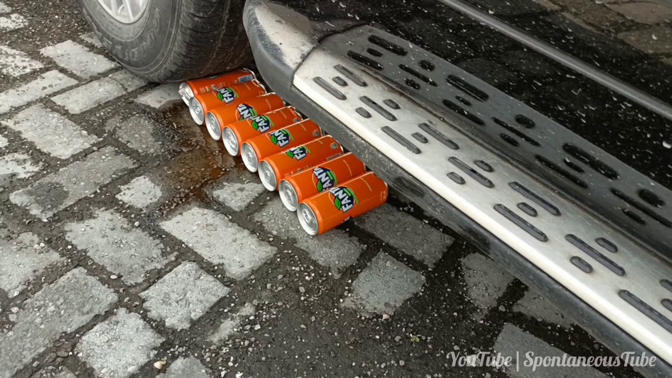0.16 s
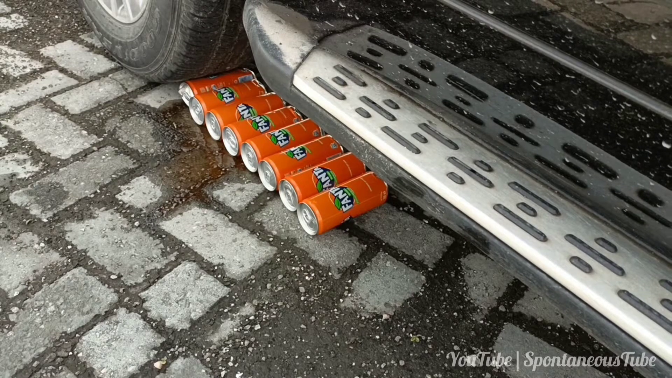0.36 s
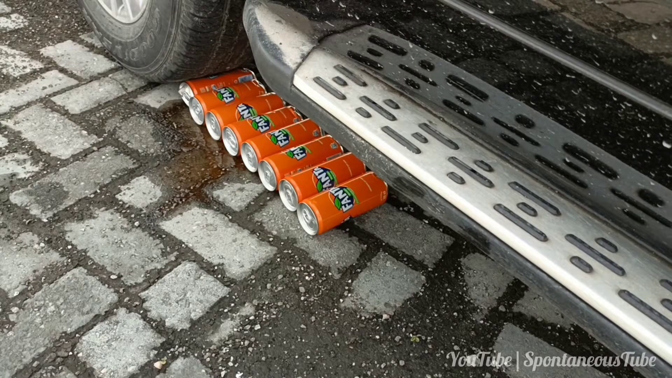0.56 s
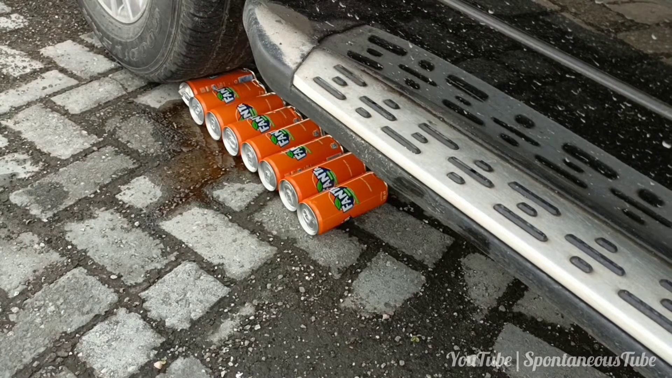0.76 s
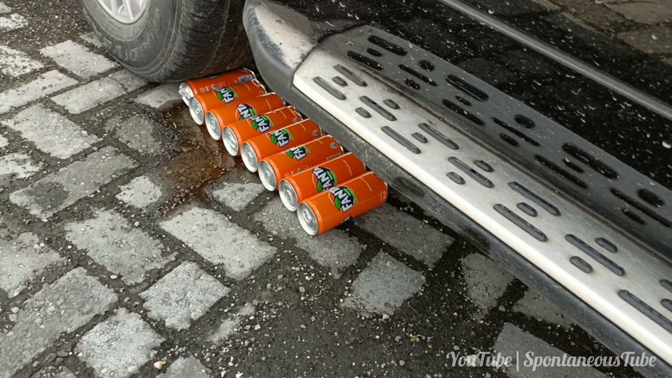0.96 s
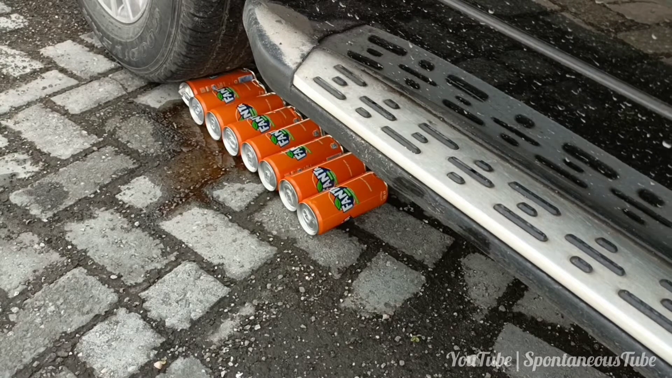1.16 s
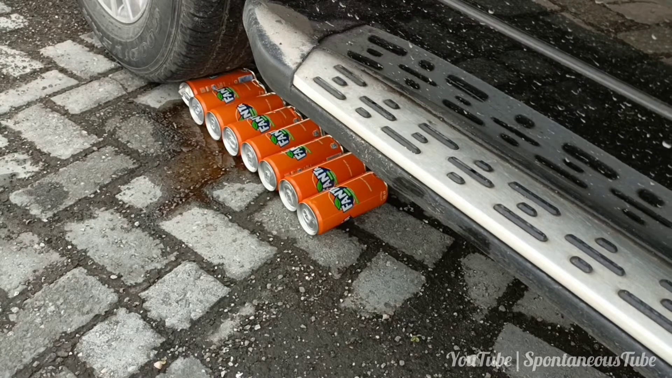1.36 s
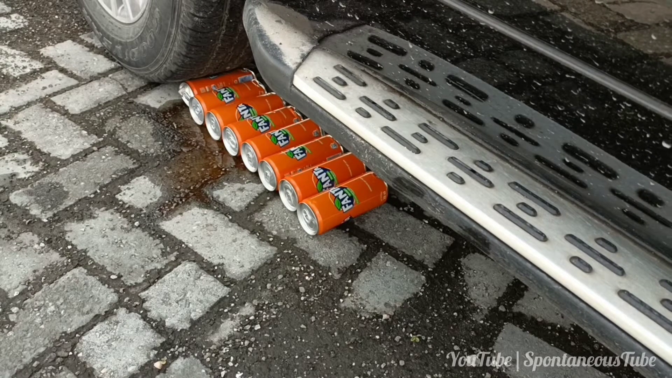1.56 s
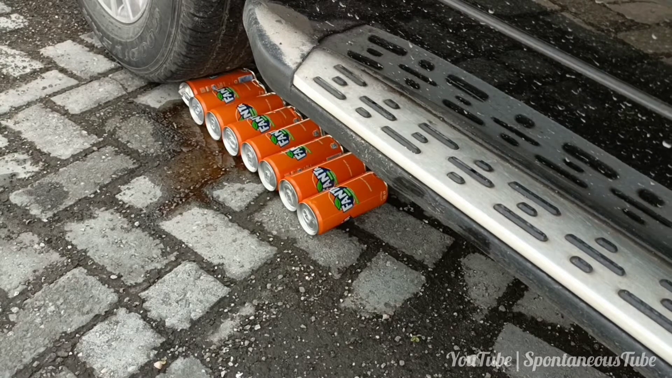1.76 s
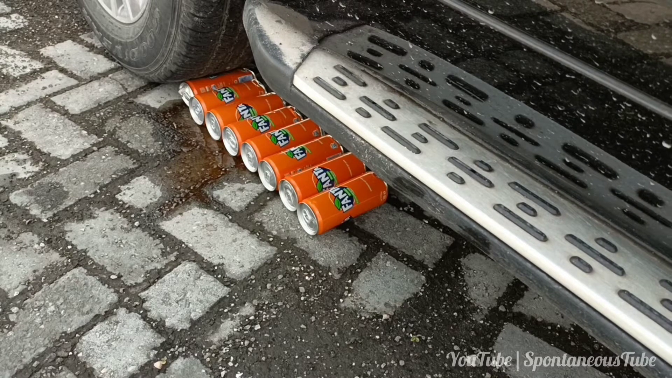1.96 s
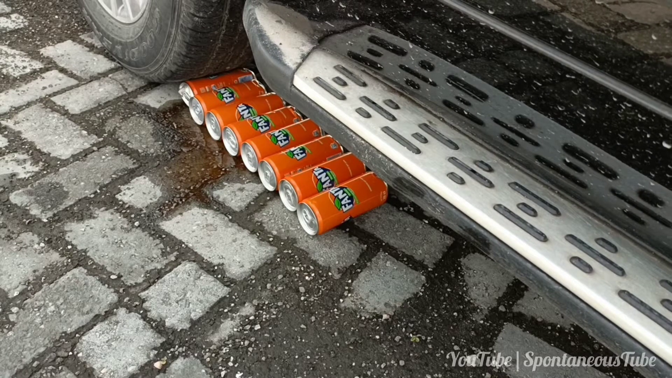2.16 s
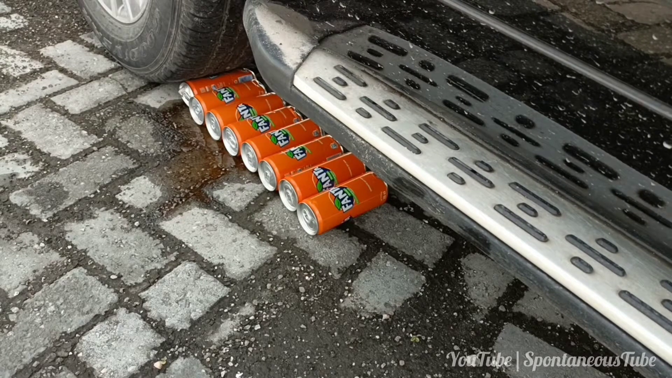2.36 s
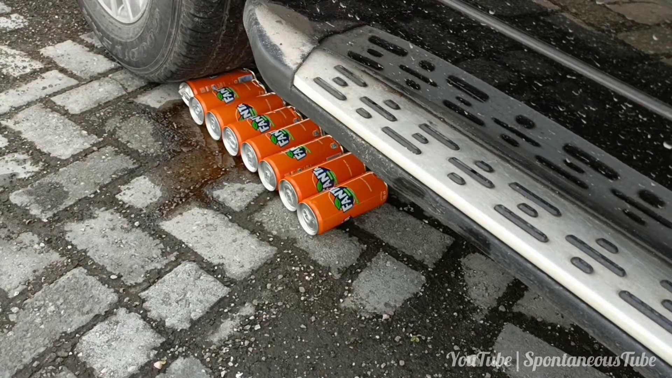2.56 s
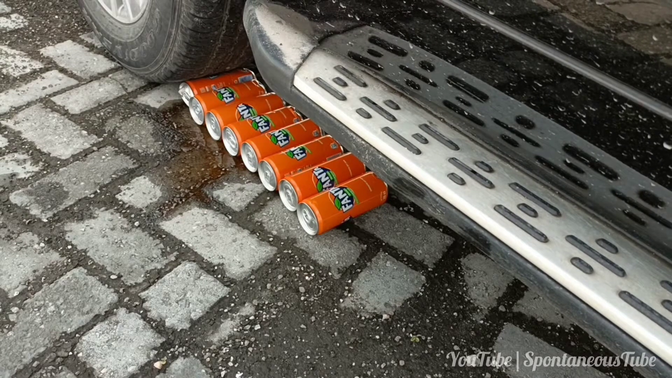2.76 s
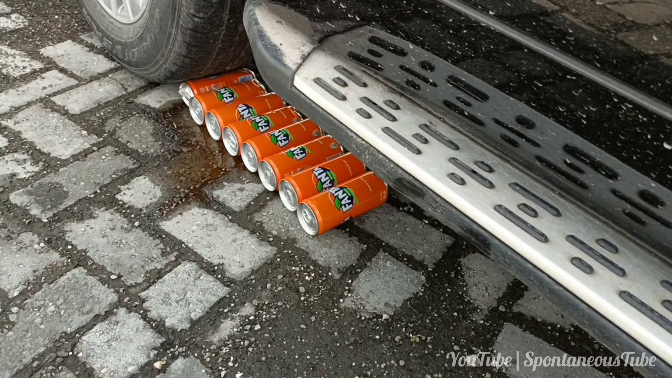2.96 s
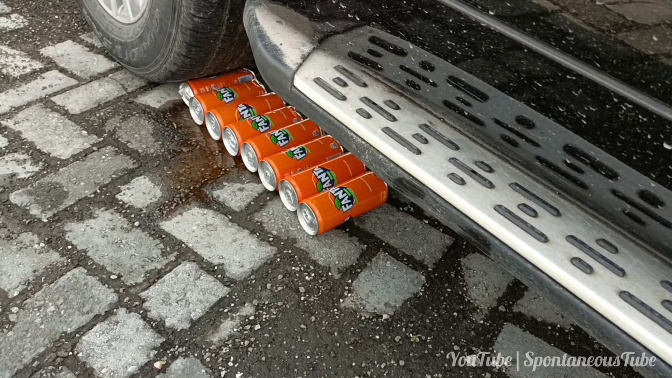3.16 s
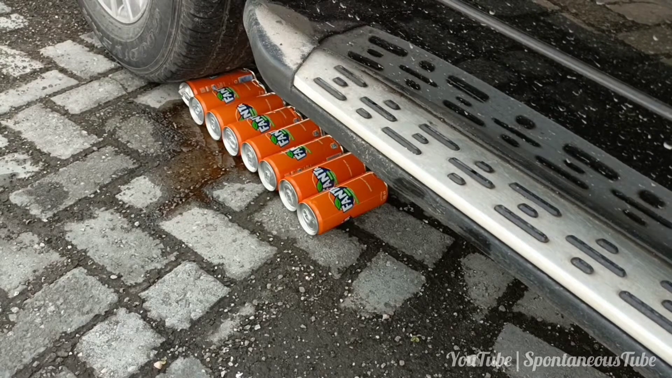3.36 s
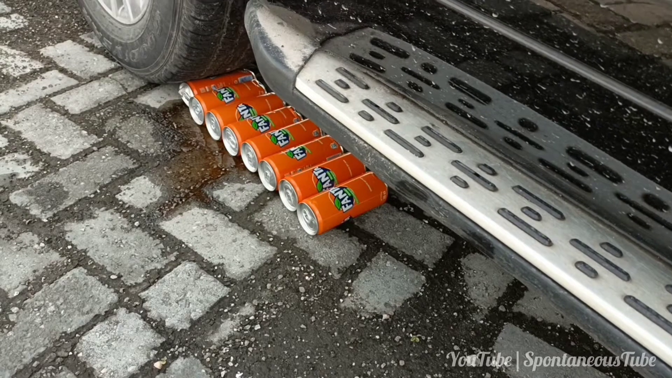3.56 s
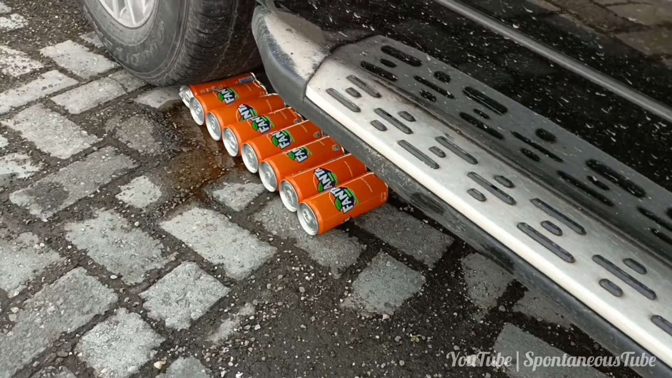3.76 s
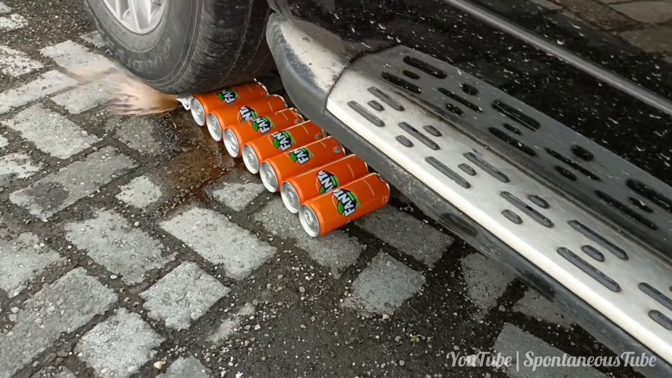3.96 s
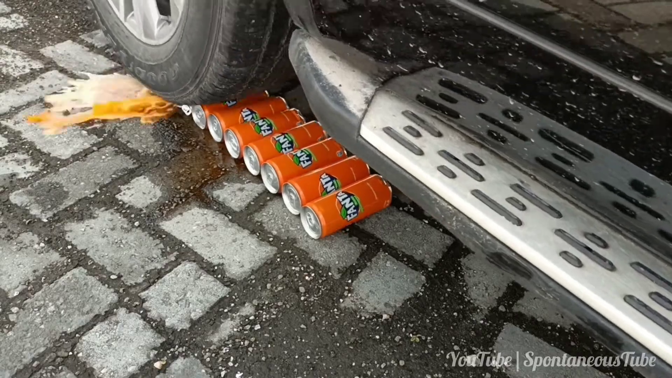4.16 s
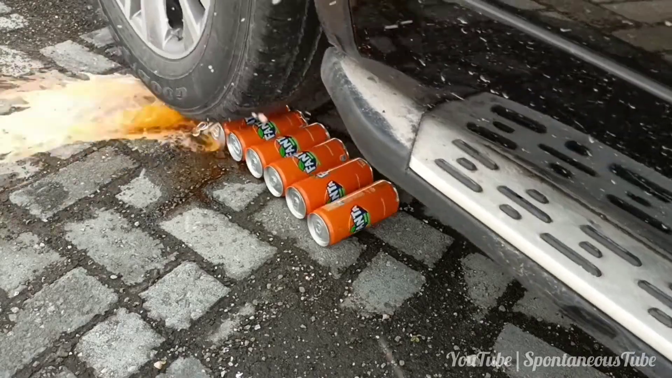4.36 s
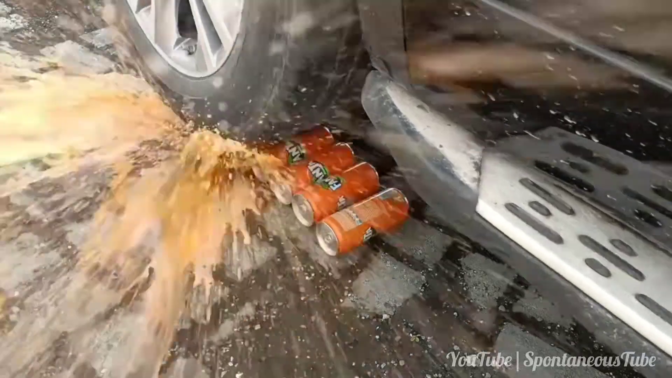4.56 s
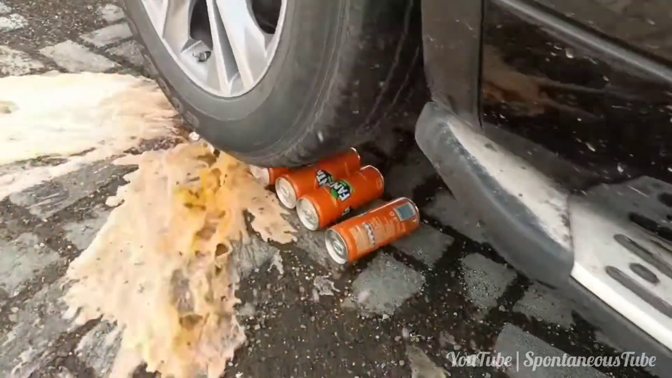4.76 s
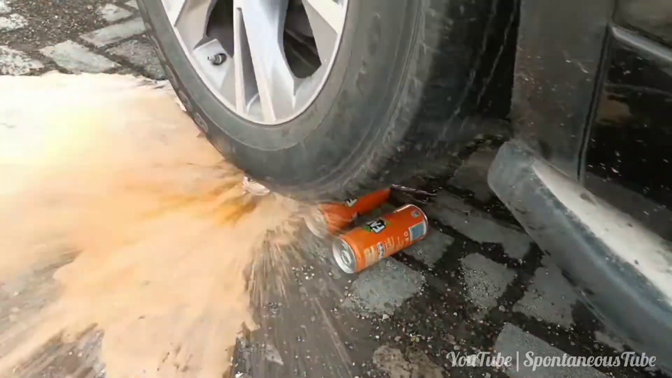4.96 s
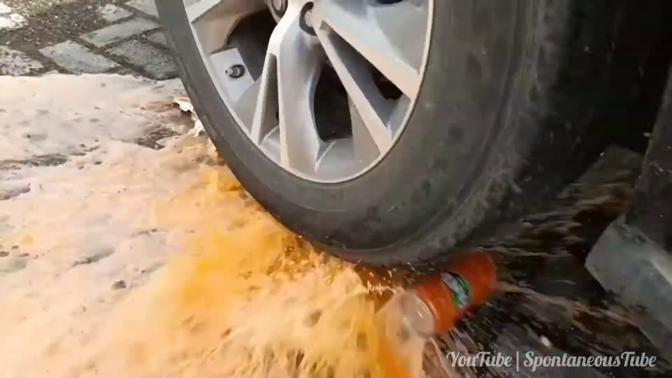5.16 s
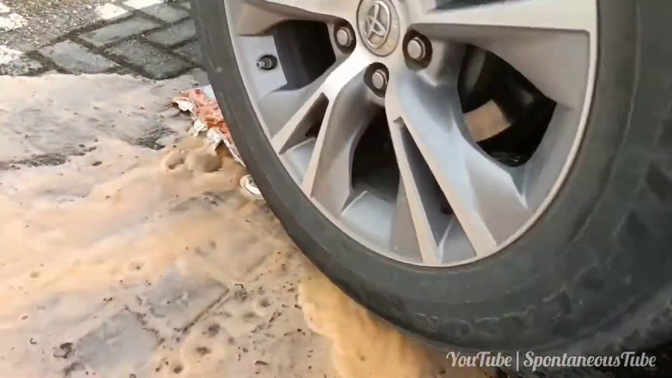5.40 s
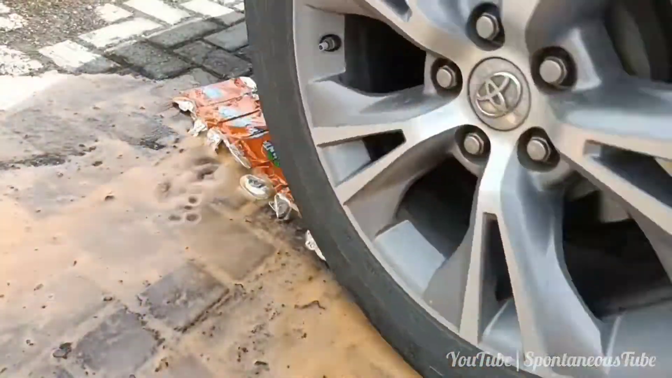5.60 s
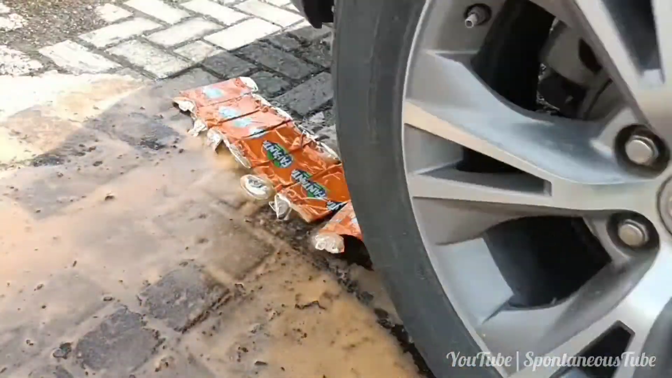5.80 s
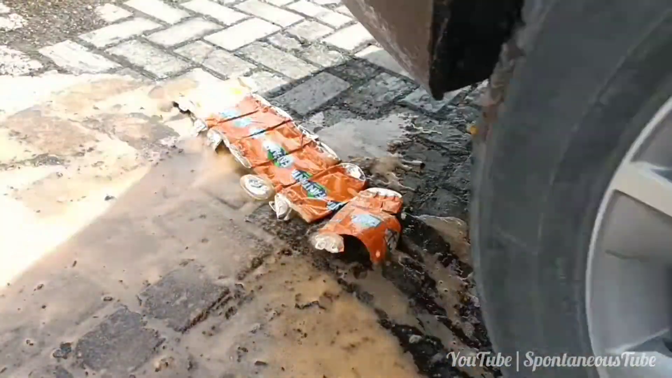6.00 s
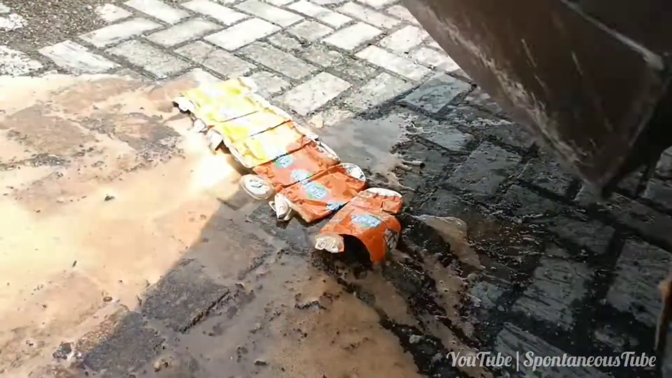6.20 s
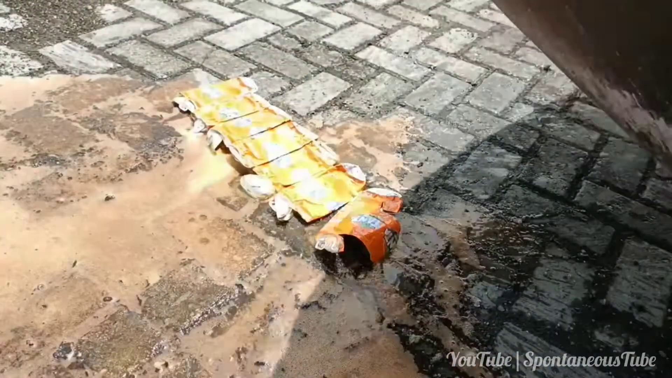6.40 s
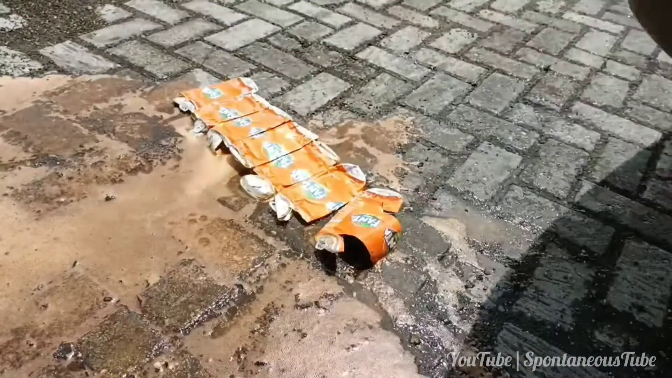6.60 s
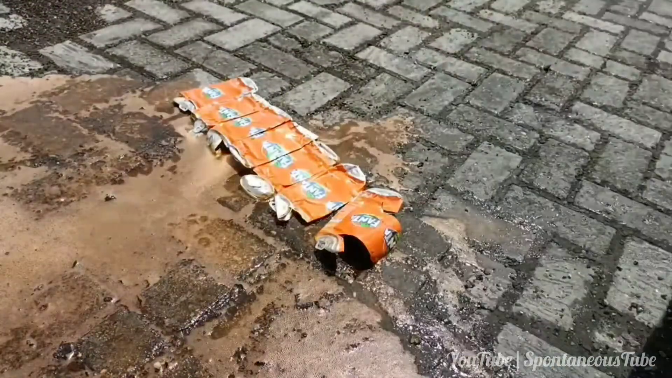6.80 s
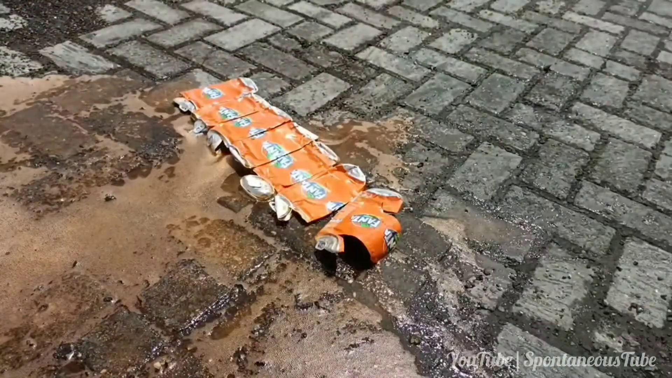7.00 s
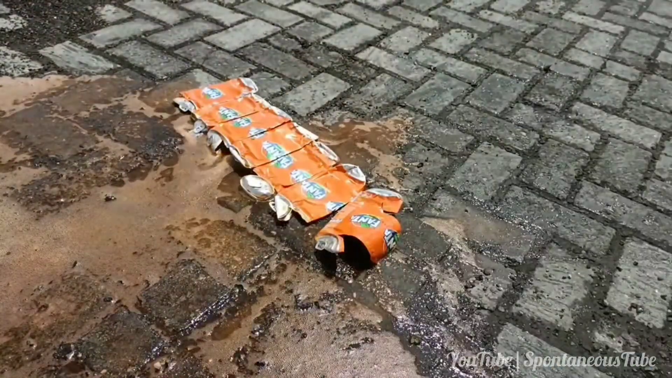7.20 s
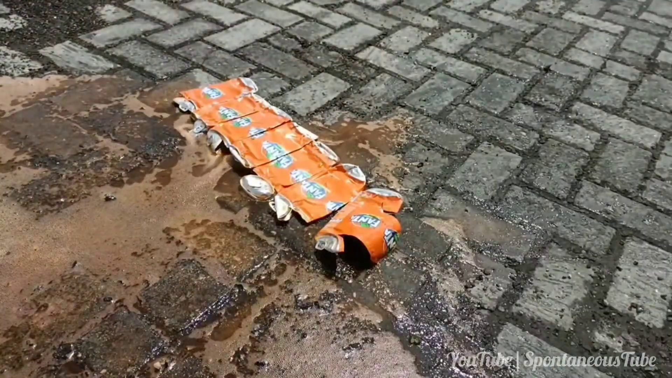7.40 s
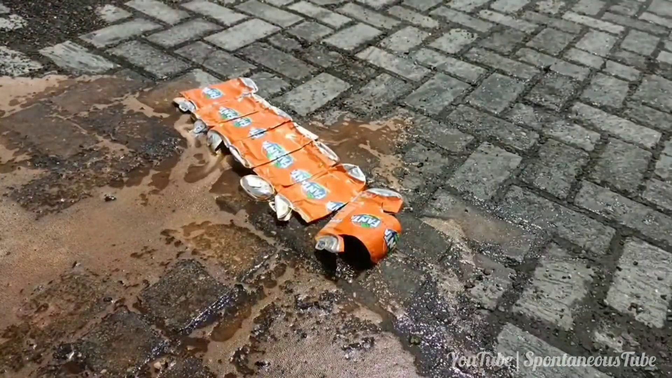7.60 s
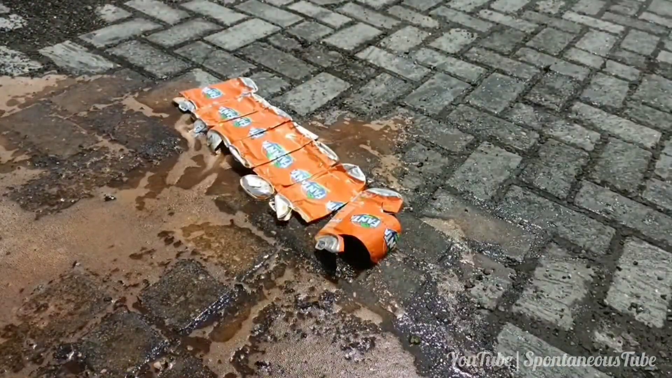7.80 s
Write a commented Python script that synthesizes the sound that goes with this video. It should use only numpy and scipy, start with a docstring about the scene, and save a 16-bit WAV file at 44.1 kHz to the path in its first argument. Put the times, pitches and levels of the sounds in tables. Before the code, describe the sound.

A car idles quietly on paving, clunks into drive, then a tyre bursts a row of full drink cans with sharp cracks, spray and wind buffeting.

```python
"""Car crushing drink cans

A car idles on paving, engages its drive and rolls one tyre over a row of full aluminium cans.
Noise bursts through wall resonances buckle the cans; banded noise and random clicks spray and fizz.
The engine is shaped noise, ticks and ringing parts; wind buffets a small microphone, lightly
before the cans and strongly after them.
"""
import sys
import numpy as np
from scipy import signal
from scipy.fft import rfft, irfft
from scipy.io import wavfile
from scipy.ndimage import uniform_filter1d

SR = 44100
rng = np.random.default_rng(int(sys.argv[2]) if len(sys.argv) > 2 else 0)


def inscribe(sig):
    """Save sig as 16-bit PCM at rate SR to the path in sys.argv[1].

    A 1-D sig is mono; a 2-D sig holds one channel per row.
    Samples are clipped to [-1, 1] before scaling.
    """
    pcm = np.round(np.clip(np.atleast_2d(sig).T, -1, 1) * 32767)
    wavfile.write(sys.argv[1], SR, pcm.astype(np.int16))


N = 345876

# Engine noise spectrum, interpolated over log f: [f/Hz, relative density/dB]
IDLE_SPECTRUM = [(18, -53.5), (30, 2.5), (75, 3.5), (161, -0.5), (266, -4), (303, -5.5), (437, -6),
                 (616, -10.5), (1350, -13), (1860, -10), (3580, -20), (3870, -20), (8080, -20.5),
                 (10500, -21.5), (16000, -21)]
# Engine level change: [t/s, level/dB]
ENGINE_LEVEL = [(0, 4), (3.2, 4.5), (3.6, 7.5), (3.88, -2.5), (4.1, -9), (4.66, -16.5), (5.1, -25),
                (5.25, 5.5), (6.05, 6.5), (7.0, 3.5), (7.84, 0)]
# Steadily ringing engine parts: [f/Hz, width/Hz, mean level/dB]
ENGINE_MODES = [(1338, 75, -65.5), (1022, 44, -73), (5640, 140, -77.5), (10100, 300, -76)]
# Injector tick resonances: [f/Hz, width/Hz, relative level/dB]
TICK_MODES = [(9070, 360, 7), (10300, 750, -1), (15000, 1200, -3)]
# Brief whistle swells: [centre t/s, level/dB]
WHISTLE_SWELLS = [(2.34, -49.5), (2.66, -58.5), (2.77, -53.5), (2.87, -56), (2.98, -58), (3.02, -62),
                  (3.07, -47), (3.27, -56), (3.38, -48.5), (3.452, -48.5)]
# Drive line clunks: [t/s, relative body level/dB, relative rattle level/dB, base t60/s]
DRIVE_CLUNKS = [(1.4, -19.5, -41, 0.18), (1.476, -21.5, -48, 0.1), (1.665, -28, -55, 0.16),
                (3.446, -24, -67, 0.054)]
# Chassis resonances: [f/Hz, width/Hz, relative level/dB]
CHASSIS_MODES = [(175, 65, 1), (225, 10, -10.5), (411, 12.5, 0), (490, 29, -14), (976, 16, -22)]
# Loose metal resonances: [f/Hz, width/Hz, relative level/dB]
RATTLE_MODES = [(2100, 45, -6), (2450, 45, -8), (2800, 50, -8), (3900, 50, -7), (4400, 45, -5),
                (4750, 50, -7), (5600, 50, -7), (6300, 45, -4)]
# Wind at the microphone, a light then a strong gust, each a curve: [t/s, level/dB]
WIND_GUSTS = [
    [(1.55, -56), (1.974, -62), (2.358, -51), (2.616, -51), (2.714, -51), (2.9, -67)],
    [(6.12, -62), (6.258, -24), (6.412, -27.5), (7.35, -29), (7.562, -35), (7.84, -49)],
]
# Pushes of wind: [start t/s, hold/s, level/dB, extra reach/octaves]
WIND_BUFFETS = [(1.66, 0.061, -51, -0.2), (1.815, 0.14, -52.5, -0.33), (2.115, 0.052, -45, 0),
                (2.215, 0.033, -44, -0.072), (2.28, 0.04, -34, -0.62), (2.41, 0.034, -42, -0.58),
                (2.475, 0.014, -40, 0.094), (2.611, 0.076, -51, 0.4), (6.237, 0.021, -19, -0.027),
                (6.305, 0.08, -29, -0.31), (6.452, 0.015, -17, -0.16), (6.519, 0.042, -24, 0.13),
                (6.619, 0.019, -20, -0.17), (6.656, 0.027, -17, 1), (6.716, 0.044, -32, 0.52),
                (6.782, 0.028, -22.5, 0.42), (6.833, 0.02, -15.5, 0.18), (6.891, 0.0085, -13, 0.11),
                (6.931, 0.049, -18.5, 0.48), (7.012, 0.03, -20, 0.15), (7.127, 0.028, -16, 0.36),
                (7.176, 0.078, -17.5, 0.49), (7.317, 0.011, -12, 0.48), (7.355, 0.1, -19.5, 0.5),
                (7.486, 0.012, -22.5, 0.1), (7.595, 0.036, -29, 1), (7.717, .03, -32, 0),
                (7.783, .04, -37.5, 0.48)]
# Short metallic rings, most from flattened cans springing back: [t/s, level/dB, f/Hz, t60/s]
METAL_TWANGS = [(3.385, -44, 1107, 0.89), (3.44, -35, 204.6, 0.22), (3.606, -21, 2320, 0.034),
                (5.458, -38.5, 3400, 0.22), (5.486, -30.5, 2380, 0.11), (5.52, -19, 758, 0.12),
                (5.519, -27.5, 2650, 0.13), (5.523, -25.5, 3360, 0.057), (5.525, -31, 1504, 0.15),
                (5.53, -41, 4300, 0.08), (5.49, -33, 810, 0.15), (5.59, -41, 2960, 0.11),
                (5.625, -29.5, 1400, 0.24), (5.655, -37.5, 3560, 0.14), (5.76, -36, 1580, 0.11),
                (6.166, -43, 603, 0.32), (6.48, -37.5, 1600, 0.095), (6.721, -35, 1490, 0.072)]
# Between the cracks: [t/s, sloshing drink level/dB, crumpling wall level/dB]
SLOSH_CRUMPLE = [(3.9, -67, -50.5), (3.99, -47, -45.5), (4.074, -54, -41), (4.164, -58, -45),
                 (4.286, -41, -51.5), (4.406, -30.5, -34.5), (4.666, -48, -47.5), (4.802, -45.5, -51.5),
                 (4.942, -41, -39.5), (5.052, -33.5, -34.5), (5.188, -24, -43.5), (5.322, -40.5, -39),
                 (5.408, -39, -47), (5.568, -57, -52), (5.7, -60, -53)]
# Spray and fizz: [t/s, level/dB]
SPRAY_LEVEL = [(3.5, -67), (3.67, -62), (3.84, -40), (4.16, -39.5), (4.72, -39), (4.93, -37.5),
               (5.17, -29.5), (5.37, -27), (5.58, -40.5), (6.06, -50.5), (6.84, -66.5), (7.5, -70),
               (7.78, -55.5), (7.84, -58)]
# Buckling and bursting cans, relative levels:
# [t/s, shell crack/dB, can body pop/dB, gas spit/dB, tyre thud/dB, base t60/s]
CAN_CRACKS = [(3.6195, -7, -32, -23.5, -51, 0.075), (3.6725, -8, -28.5, -25, -54, 0.12),
              (3.698, -32, -31, -32, -55, 0.097), (3.7258, -16.5, -43, -17, -80, 0.08),
              (3.7411, -10, -54, -16, -62, 0.092), (3.7849, -11, -37.5, -19, -61, 0.067),
              (3.8673, -11, -65, -20.5, -79, 0.06), (3.915, -9.5, -64, -55, -64, 0.062),
              (3.928, -10, -44, -51, -55, 0.073), (3.9796, -18.5, -21, -19.5, -25, 0.15),
              (4.0276, -6.5, -36, -16, -29.5, 0.028), (4.046, -26, -39, -11.5, -34, 0.028),
              (4.067, -11.5, -29, -29, -36, 0.14), (4.099, -25, -47.5, -19.5, -49, 0.08),
              (4.144, -4.5, -45.5, -23, -61, 0.071), (4.1639, -5, -31, -22.5, -67, 0.042),
              (4.1744, -9.5, -38.5, -22.5, -57.5, 0.065), (4.1847, -14.5, -42.5, -30, -54, 0.056),
              (4.2008, -8.5, -37, -15, -52.5, 0.044), (4.2397, -8.5, -19, -17, -17, 0.11),
              (4.2536, -7.5, -23, -17, -50.5, 0.036), (4.3143, -20, -29, -34, -53, 0.092),
              (4.342, -14, -21, -25.5, -33.5, 0.085), (4.3728, -29, -15, -27, -16, 0.08),
              (4.3877, -6, -16, -28.5, -18, 0.068), (4.4104, -14.5, -32, -25, -25.5, 0.09),
              (4.4375, -12, -15, -45, -12.5, 0.082), (4.4496, -16, -15.5, -39.5, -31, 0.06),
              (4.4837, -31.5, -15.5, -28.5, -14, 0.035), (4.511, 2.5, -4, -16, -15, 0.068),
              (4.581, -16, -28, -18.5, -32, 0.1), (4.6036, -11, -26.5, -25, -56, 0.052),
              (4.6302, -38.5, -54.5, -18, -53.5, 0.058), (4.66, -40, -43.5, -23, -50, 0.029),
              (4.6996, -19.5, -10.5, -40, -17.5, 0.054), (4.714, -35.5, -18, -29, -18.5, 0.088),
              (4.7408, -17, -24, -21, -35, 0.093), (4.7993, -32.5, -15, -25, -13, 0.043),
              (4.81, -15, -15.5, -48, -15, 0.1), (4.8614, -15, -12, -28, -20, 0.091),
              (4.8828, -4.5, -23.5, -18, -30.5, 0.065), (4.9466, -20.5, -38.5, -41, -29, 0.08),
              (4.9658, -23.5, -24.5, -20, -18.5, 0.034), (4.9893, -2, -9.5, -16, -10.5, 0.063),
              (5.0288, -2.5, -8, -12.5, -13, 0.072), (5.0737, -13, -15, -31.5, -19, 0.094),
              (5.099, -36.5, -24, -34, -23, 0.11), (5.1202, -5.5, -12, -20.5, -8.5, 0.054),
              (5.1488, -15, -27, -22.5, -27.5, 0.044), (5.1686, 5.5, -7, -7.5, -14.5, 0.035),
              (5.2315, -18.5, -23.5, -27, -28, 0.18), (5.2745, -12, -23, -19, -35, 0.13),
              (5.308, -9.5, -28, -10.5, -69, 0.027), (5.3675, -11, -16.5, -43, -47, 0.12),
              (5.4069, -14.5, -26, -21.5, -38, 0.14), (5.4852, -18, -36, -24, -51, 0.14),
              (5.5216, -26, -44, -24, -53, 0.045), (5.544, -19, -36, -24, -58, 0.043),
              (5.6291, -36, -34.5, -50, -59, 0.095), (5.6514, -23, -42, -25, -62, 0.1),
              (5.723, -46, -43, -30.5, -49, 0.075), (5.8137, -29.5, -45, -32.5, -54, 0.24),
              (5.9862, -41, -60, -33, -67, 0.056)]
# Can wall resonances: [f/Hz, width/Hz, relative level/dB]
SHELL_MODES = [(1693, 38, 6), (1980, 62, -7), (2270, 200, 3), (2910, 79, -8.5), (3210, 59, -8.5),
               (3890, 100, 0.5), (4260, 100, -10.5), (5230, 170, 9), (5620, 310, -5)]
# Fine foam on the puddle: [t/s, level/dB]
FOAM_LEVEL = [(5.3, -80), (5.55, -47), (6.1, -51.5), (6.6, -57.5), (7.081, -60.5), (7.16, -78)]
# Microphone port colour: [f/Hz, width/Hz, gain/dB]
PORT_MODES = [(8470, 3060, -8.5), (10780, 3200, 6.5), (13120, 3100, -12), (15340, 500, 12.5)]

IDLE_DB = -55
TICK_START_S, TICK_GAP_S, TICK_DB = 0.135, 0.1503, -61
CHIRP_HZ, CHIRPS_PER_S, CHIRP_DB = 3860, 16.3, -69
PUFF_S, PUFF_WIDTH_S, PUFF_HZ, PUFF_DB = 0.506, 0.025, 10000, -53
WHISTLE_HZ, WHISTLE_HALF_S = 2330, 0.03
WIND_LUMP_DB, WIND_LUMP_RATE_HZ, WIND_FOOT_HZ = 2, 52, 81
WIND_TILT_DB_PER_OCTAVE, WIND_EDGE_DB_PER_OCTAVE = -3, -41
BUFFET_RISE_S, BUFFET_FALL_S = 0.014, 0.019
REACH_OCTAVES, REACH_OCTAVES_PER_DB = 2.723, 0.037  # above the foot at 0 dB; stronger is brighter
# Full, taut cans all ring alike until the first one bursts.
FIRST_BURST_S, TAUT_RING_HZ, RING_WIDTH_HZ = 3.97, 2274, 220
HUM_HZ, HUM_START_S, HUM_RISE_S, HUM_DB, HUM_T60_S = 197.5, 5.2, 0.03, -38, 3.1
LOW_CUT_HZ, HIGH_CUT_HZ = 77, 16300


def amp(db):
    """dB to gain."""
    return 10 ** (np.asarray(db) / 20)


def unit(x):
    """Scale to rms 1."""
    return x / np.sqrt(np.mean(x ** 2) + 1e-20)


def noise():
    """White noise, rms 1."""
    return rng.standard_normal(N)


def in_time(rows):
    """Columns of a curve, one value a sample."""
    t_s, *columns = np.transpose(rows)
    return [np.interp(np.arange(N) / SR, t_s, column) for column in columns]


def band(x, low_hz, high_hz, order=2):
    """Band-pass that keeps the rms of white noise."""
    sos = signal.butter(order, [low_hz, high_hz], "band", fs=SR, output="sos")
    return signal.sosfilt(sos, x + 1e-18) * np.sqrt(SR / 2 / (high_hz - low_hz))


def resonance(x, hz, width_hz):
    """Two-pole resonance that keeps the rms of white noise."""
    r = np.exp(-np.pi * width_hz / SR)
    zeros = np.sqrt((1 - r * r) / 2) * np.array([1, 0, -1])
    poles = [1, -2 * r * np.cos(2 * np.pi * hz / SR), r * r]
    return signal.lfilter(zeros, poles, x + 1e-18)


def modes(x, table):
    """Sum of resonances driven by one sound."""
    return sum(amp(db) * resonance(x, hz, width_hz) for hz, width_hz, db in table)


def drift(rate_hz):
    """Slow random curve, rms 1: low-passed noise made at SR/20."""
    r = np.exp(-40 * np.pi * rate_hz / SR)
    slow = signal.lfilter([1], [1, -2 * r, r * r], rng.standard_normal(N // 20 + 4002))
    slow = unit(slow[4000:])  # settled part
    return np.interp(np.arange(N) / 20, np.arange(len(slow)), slow)


def grains(per_s, spread_db):
    """Random clicks of very uneven size, rms 1."""
    sizes = amp(spread_db * np.minimum(rng.exponential(1, N), 4))
    signs = rng.choice([-1, 1], N)
    return unit(sizes * signs * (rng.random(N) < per_s / SR))


def dying(times_s, levels_db, t60s_s, rise_s, snap_db=-52.0, snap_s=0.0025):
    """Blow envelopes: fast rise, short snap on top, exponential decay cut at 0.5 s."""
    out, t = np.zeros(N + SR), np.arange(SR // 2) / SR
    for time_s, level_db, t60_s in zip(times_s, levels_db, t60s_s):
        at = round(time_s * SR)
        shape = amp(-60 * t / t60_s) + amp(snap_db) * np.exp(-t / snap_s)
        out[at:at + len(t)] += amp(level_db) * shape * (1 - np.exp(-t / rise_s))
    return out[:N]


def swell(centre_s, half_s):
    """Bell-shaped envelope, 1/e at half_s from its centre."""
    return np.exp(-((np.arange(N) / SR - centre_s) / half_s) ** 2)


def engine():
    """Idle noise, ringing parts, ticks, chirp and puff share one level curve; the whistle does not."""
    change_db, = in_time(ENGINE_LEVEL)
    parts = small_parts(level_db=-77.0, tilt_db_per_octave=-0.5, per_s=14, width_hz=16)
    running = idle() + ringing_parts() + parts + chirp() + ticks() + puff()
    return amp(change_db) * running + whistle()


def idle():
    """Noise shaped by the idle spectrum, level wavering."""
    hz = np.maximum(np.fft.rfftfreq(N, 1 / SR), 1)
    shape_hz, shape_db = np.transpose(IDLE_SPECTRUM)
    shape = amp(np.interp(np.log(hz), np.log(shape_hz), shape_db))
    return amp(IDLE_DB + 1.1 * drift(9.8)) * unit(irfft(rfft(noise()) * shape, N))


def ringing_parts():
    """Narrow resonances driven by noise, each wavering alone."""
    return sum(amp(db + 3.2 * drift(24)) * resonance(noise(), hz, width_hz)
               for hz, width_hz, db in ENGINE_MODES)


def small_parts(level_db, tilt_db_per_octave, per_s, width_hz):
    """Loose parts in the engine bay, knocked at random, ring briefly at their own pitches."""
    pitches_hz = np.geomspace(700, 7000, 36) * amp(rng.normal(0, 0.25, 36))
    out = 0
    for hz in pitches_hz:
        tilt_db = tilt_db_per_octave * np.log2(hz / 700)
        out = out + amp(tilt_db) * resonance(grains(per_s, 2.8), hz, width_hz)
    return amp(level_db) * out


def chirp():
    """Narrow noise pulsing fast and regularly."""
    t = np.arange(N) / SR
    throb = (0.5 + 0.5 * np.cos(2 * np.pi * CHIRPS_PER_S * t - 2.5)) ** 0.61
    return amp(CHIRP_DB + 2.5 * drift(4)) * throb * resonance(noise(), CHIRP_HZ, 60)


def ticks():
    """Injector ticks: evenly spaced noise bursts through high resonances."""
    at_s = np.arange(TICK_START_S, N / SR, TICK_GAP_S)
    levels_db = TICK_DB + rng.normal(0, 1.4, len(at_s))
    bursts = noise() * dying(at_s, levels_db, np.full_like(at_s, 0.038), 0.00045)
    return modes(bursts, TICK_MODES)


def puff():
    """One brief swell of broad high noise."""
    return amp(PUFF_DB) * swell(PUFF_S, PUFF_WIDTH_S) * resonance(noise(), PUFF_HZ, 2900)


def clunks():
    """Dull blows into the chassis modes with a loose metal rattle on top."""
    t_s, body_db, rattle_db, t60_s = np.transpose(DRIVE_CLUNKS)
    shake = noise() * dying(t_s, body_db - 7.5, t60_s, 0.02)
    rattle = (noise() + 0.32 * grains(710, 1.6)) * dying(t_s, rattle_db, 0.83 * t60_s, 0.006)
    body = modes(shake, CHASSIS_MODES)
    metal = modes(rattle, RATTLE_MODES)
    return body + 3.5 * band(rattle, 2700, 13000, order=1) + metal


def wind():
    """Lumpy low noise; stronger and faster eddies reach higher before a steep edge."""
    rows = []
    for gust in WIND_GUSTS:
        rows += [(gust[0][0] - 0.05, -90)] + list(gust) + [(gust[-1][0] + 0.11, -90)]
    strength, extra_octaves = amp(in_time(rows)[0]), 0
    lump, t = drift(WIND_LUMP_RATE_HZ), np.arange(N) / SR
    for start_s, hold_s, push_db, more_octaves in WIND_BUFFETS:
        top_s = start_s + BUFFET_RISE_S
        corners_s = [start_s, top_s, top_s + hold_s, top_s + hold_s + BUFFET_FALL_S]
        shape = np.sin(np.interp(t, corners_s, [0, 1, 1, 0]) * np.pi / 2) ** 2
        strength = strength + amp(push_db) * shape
        extra_octaves = extra_octaves + more_octaves * shape
    strength_db = 20 * np.log10(strength)
    reach = REACH_OCTAVES + 0.094 * lump + REACH_OCTAVES_PER_DB * strength_db + extra_octaves
    white = rng.standard_normal((2, N))  # neighbouring bands use independent noise
    out, power = 0, 0
    edges_hz = 45 * 2 ** np.arange(0, 5.4, 1 / 3)
    for k, (low_hz, high_hz) in enumerate(zip(edges_hz, edges_hz[1:])):
        octave = np.log2(np.sqrt(low_hz * high_hz) / WIND_FOOT_HZ)
        slopes_db = WIND_TILT_DB_PER_OCTAVE * max(octave, 0) + 20.0 * min(octave, 0)
        slopes_db = slopes_db + WIND_EDGE_DB_PER_OCTAVE * np.maximum(octave - reach, 0)
        gain = amp(slopes_db + 3.96 * drift(35))
        out = out + gain * band(white[k % 2], low_hz, high_hz, order=4)
        power = power + gain ** 2
    return strength * amp(WIND_LUMP_DB * lump) * out / np.sqrt(power)


def whistle():
    """Noise through two narrow resonances, in brief swells."""
    level = sum(amp(db) * swell(t_s, WHISTLE_HALF_S) for t_s, db in WHISTLE_SWELLS)
    tone = resonance(resonance(noise(), WHISTLE_HZ, 70), WHISTLE_HZ, 59)
    return level * unit(tone)


def twangs():
    """Struck single modes: decaying sines, slightly roughened in level and phase."""
    t, out = np.arange(N) / SR, 0
    for t_s, db, hz, t60_s in METAL_TWANGS:
        level = dying([t_s], [db], [t60_s], 0.0011) * amp(2.7 * drift(45))
        out = out + level * np.sin(2 * np.pi * hz * (t - t_s) + 1.1 * drift(30))
    return out


def shell(x, ring_share, waver_db):
    """Can wall: broad crackle plus resonances whose strengths change as the metal folds."""
    ringing = sum(amp(db + waver_db * drift(45)) * resonance(x, hz, width_hz)
                  for hz, width_hz, db in SHELL_MODES)
    scale = np.sqrt(sum(amp(2 * db) for _, _, db in SHELL_MODES))
    crackle = band(x, 1520, 4800, order=3)
    return np.sqrt(1 - ring_share) * crackle + np.sqrt(ring_share) * ringing / scale


def patchy(x, patch_db, rate_hz):
    """Treble in four bands that swell and fade on their own."""
    edges_hz, out = [4500, 6500, 9000, 12500, 18000], 0
    for low_hz, high_hz in zip(edges_hz, edges_hz[1:]):
        share = np.sqrt((high_hz - low_hz) / 13500)
        out = out + amp(patch_db * drift(rate_hz)) * share * band(x, low_hz, high_hz, order=3)
    return out


def crush():
    """Drink sloshes out, the wall crumples in small folds, the spray fizzes."""
    rows = [(3.55, -87, -67)] + list(SLOSH_CRUMPLE) + [(5.9, -92, -53), (6.2, -88.5, -90.5)]
    flow_db, fold_db = in_time(rows)
    spray_db, = in_time([(0, -90), (3.45, -88)] + list(SPRAY_LEVEL))
    flow = unit(0.25 * noise() + 0.35 * grains(400, 6.9))
    slosh = band(amp(flow_db + 0.55 * drift(29)) * flow, 68, 1300, order=3)
    folds = unit(0.77 * noise() + 0.39 * grains(1100, 10.0))
    crumple = shell(amp(fold_db + 5.0 * drift(20)) * folds, ring_share=0.4, waver_db=1.5)
    fizz = 0.63 * noise() + 0.21 * grains(2400, 14.0)
    spray = patchy(amp(spray_db + 2.8 * drift(21)) * fizz, patch_db=2.0, rate_hz=25)
    return slosh + crumple + spray


def slips():
    """Stick-slip noise: random clicks over white noise."""
    return 0.32 * grains(2500, 2.7) + 0.66 * noise()


def snaps(times_s, levels_db):
    """One click of random sign at each blow, 30 samples in."""
    out = np.zeros(N)
    at = np.round(times_s * SR).astype(int) + 30
    out[at] = amp(levels_db) * rng.choice([-1, 1], len(times_s))
    return out


def rings(x, times_s, pitches_hz, width_hz):
    """Up to the next blow, 0.25 s at most, the sound passes through each blow's own resonance."""
    out, at = np.zeros(N + SR), [round(t_s * SR) for t_s in times_s] + [N]
    for start, stop, hz in zip(at, at[1:], pitches_hz):
        piece = np.concatenate([x[start:min(stop, start + SR // 4)], np.zeros(SR // 20)])
        out[start:start + len(piece)] += resonance(piece, hz, width_hz)
    return out[:N]


def cracks():
    """Each fold is a snap and a burst of slips that shake tyre, can body, wall and escaping gas."""
    t_s, crack_db, pop_db, spit_db, thud_db, t60_s = np.transpose(CAN_CRACKS)
    # Each fold favours one wall mode, mostly a low one.
    favoured = (rng.random(len(t_s)) ** 2 * len(SHELL_MODES)).astype(int)
    ring_hz = np.array(SHELL_MODES)[favoured, 0]
    ring_hz[t_s < FIRST_BURST_S] = TAUT_RING_HZ

    thud_env = dying(t_s, thud_db, 1.37 * t60_s, 0.003, snap_db=-9.5, snap_s=0.0046)
    thud = band(slips() * thud_env, 90, 546, order=3)

    pop_env = dying(t_s, pop_db - 7.0, 1.41 * t60_s, 0.0012, snap_db=10.5, snap_s=0.0016)
    pop = band(slips() * pop_env + snaps(t_s, pop_db + 13.5), 570, 1134, order=3)

    fold_env = dying(t_s, crack_db - 16.5, t60_s, 0.00094, snap_db=10.0, snap_s=0.001)
    fold = slips() * fold_env + snaps(t_s, crack_db - 0.5)
    crack = shell(fold, ring_share=0.11, waver_db=3.0)
    crack = crack + amp(-0.5) * rings(fold, t_s, ring_hz, RING_WIDTH_HZ)

    spit_env = dying(t_s, spit_db, 0.99 * t60_s, 0.0002, snap_db=0.5, snap_s=0.00092)
    spit = patchy(slips() * spit_env, patch_db=3.0, rate_hz=7)
    return thud + pop + crack + spit


def hum():
    """Low sine that sets in under load, wavers a little in pitch and fades."""
    t = np.maximum(np.arange(N) / SR - HUM_START_S, 0)
    phase = 2 * np.pi * np.cumsum(HUM_HZ * (1 + 0.012 * drift(7.4))) / SR
    level = amp(HUM_DB - 60 * t / HUM_T60_S + 1.4 * drift(19))
    return level * (1 - np.exp(-t / HUM_RISE_S)) * np.sin(phase)


def foam():
    """Tiny bubbles burst densely in a high, narrow band."""
    level_db, = in_time([(0.0085, -86.0)] + list(FOAM_LEVEL) + [(7.3, -92)])
    bubbles = 0.83 * noise() + 0.58 * grains(5000, 2.5)
    return amp(level_db + 1.4 * drift(20)) * band(bubbles, 9100, 12300, order=4)


def give_way(loud, knee_db, slope, release_db_per_s):
    """Gain for quiet sounds: down at once under loud ones, up again at a steady rate."""
    power_db = 10 * np.log10(uniform_filter1d(loud ** 2, size=200) + 1e-12)
    over_db = np.maximum(power_db - knee_db, 0)
    ramp_db = release_db_per_s * np.arange(N) / SR
    held_db = np.maximum.accumulate(over_db + ramp_db) - ramp_db
    return amp(-slope * uniform_filter1d(held_db, size=150))


def scene():
    """Sum of sources; the engine is turned down under cracks and gusts, spray and foam under gusts."""
    blows, gusts = cracks(), wind()
    around = engine() * give_way(blows + gusts, knee_db=-31.5, slope=0.63, release_db_per_s=394)
    wet = crush() * give_way(gusts, knee_db=-30.5, slope=0.11, release_db_per_s=398.5)
    froth = foam() * give_way(gusts, knee_db=-26.5, slope=0.91, release_db_per_s=499.5)
    return (around + clunks() + gusts + twangs() + wet + blows + hum() + froth)[None]


def peaking(x, hz, width_hz, gain_db):
    """Bump or dip in the spectrum."""
    w, a = 2 * np.pi * hz / SR, amp(gain_db / 2)
    k = np.sin(w) * width_hz / hz / 2
    zeros = [1 + k * a, -2 * np.cos(w), 1 - k * a]
    poles = [1 + k / a, -2 * np.cos(w), 1 - k / a]
    return signal.lfilter(zeros, poles, x)


def record(dry):
    """Port resonances colour the treble, deep bass is cut, peaks are rounded, the top is cut."""
    for hz, width_hz, gain_db in PORT_MODES:
        dry = peaking(dry, hz, width_hz, gain_db)
    dry = signal.sosfilt(signal.butter(2, LOW_CUT_HZ, "high", fs=SR, output="sos"), dry)
    rounded = 0.8 * np.tanh(dry / 0.8)
    return signal.sosfilt(signal.cheby2(12, 60, HIGH_CUT_HZ, fs=SR, output="sos"), rounded)


dry = scene()
out = record(dry)
inscribe(out)
```